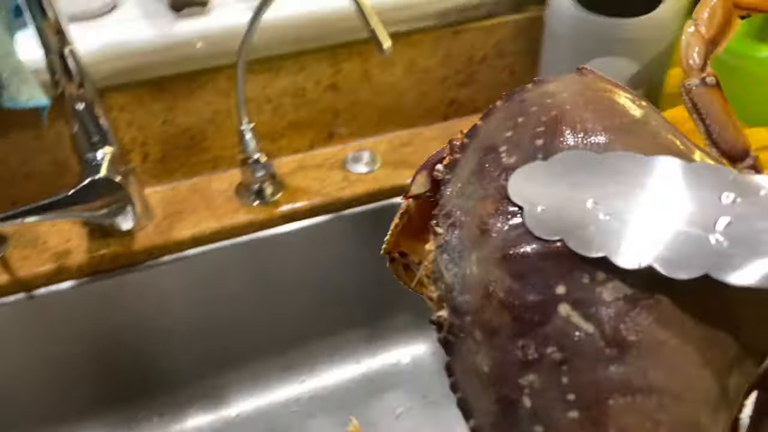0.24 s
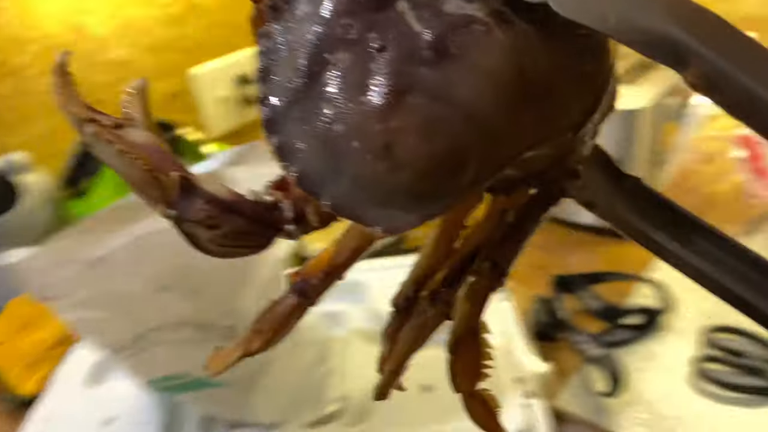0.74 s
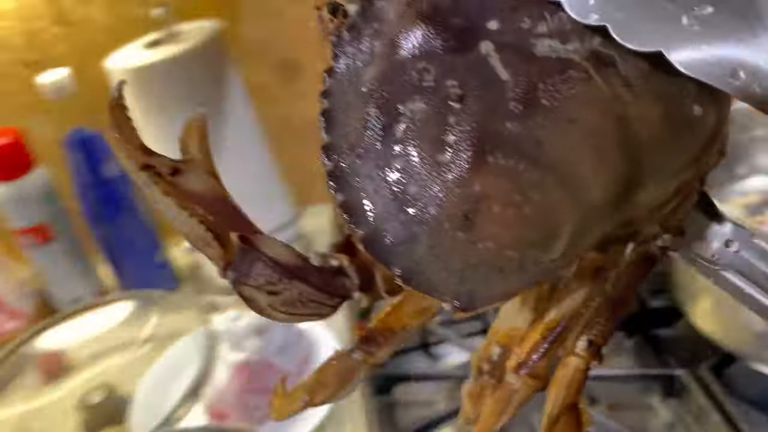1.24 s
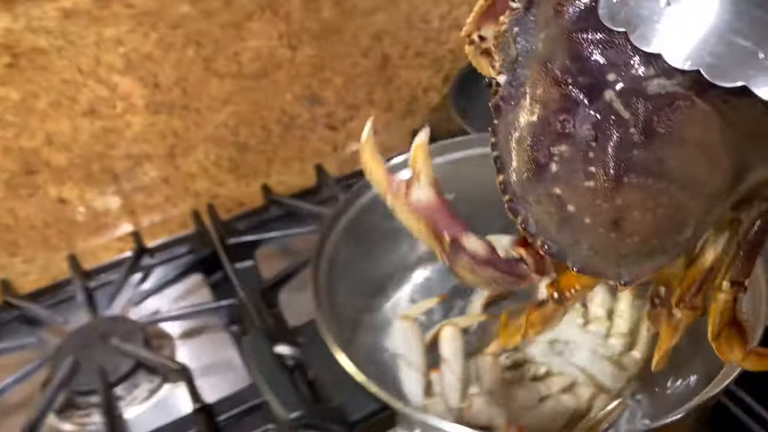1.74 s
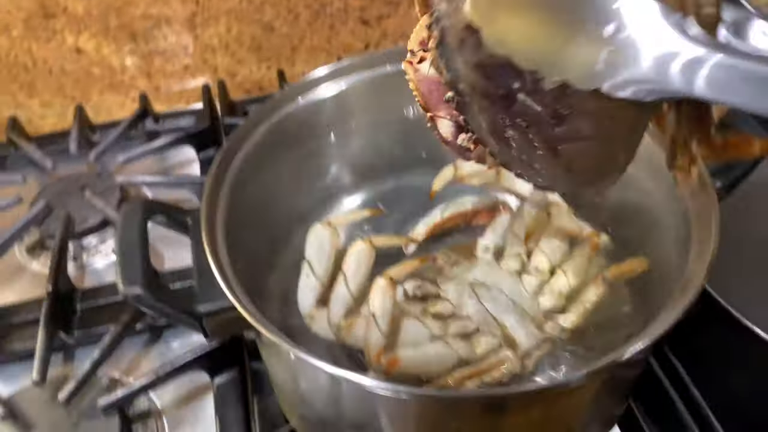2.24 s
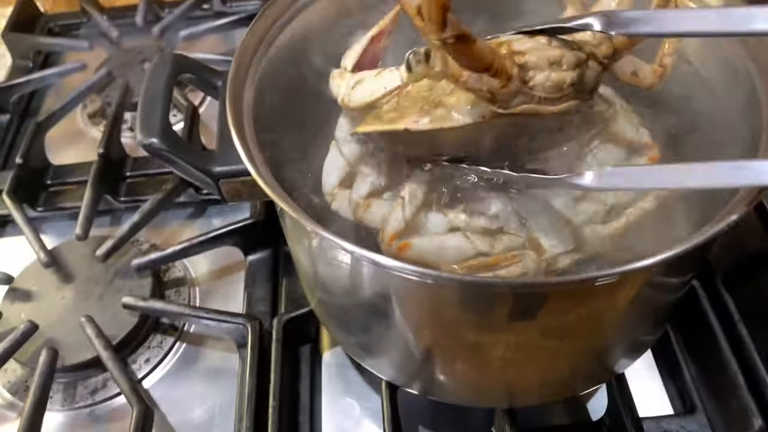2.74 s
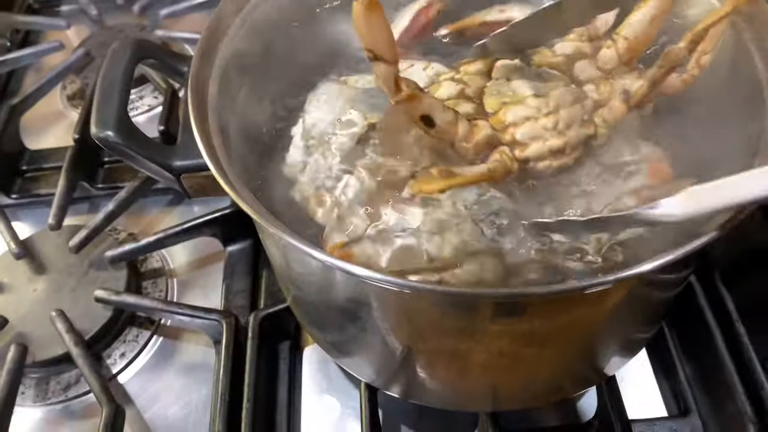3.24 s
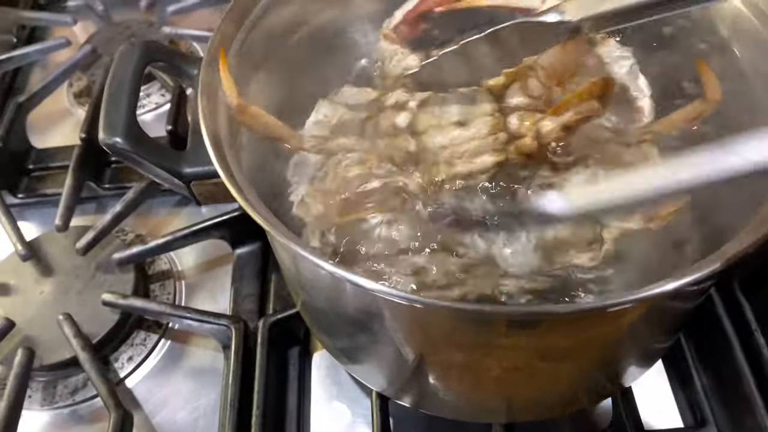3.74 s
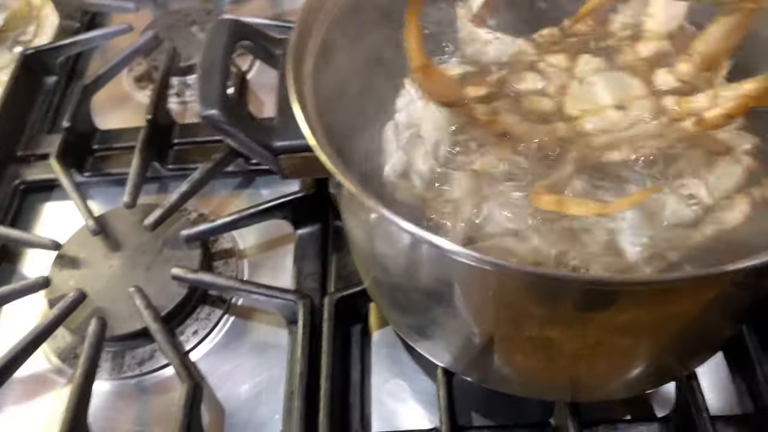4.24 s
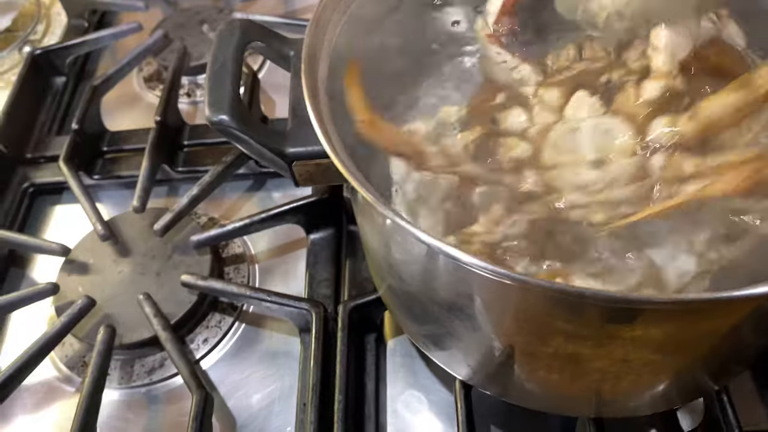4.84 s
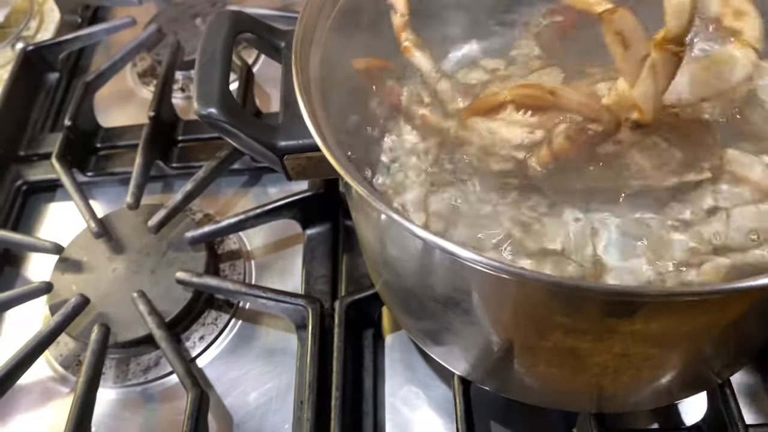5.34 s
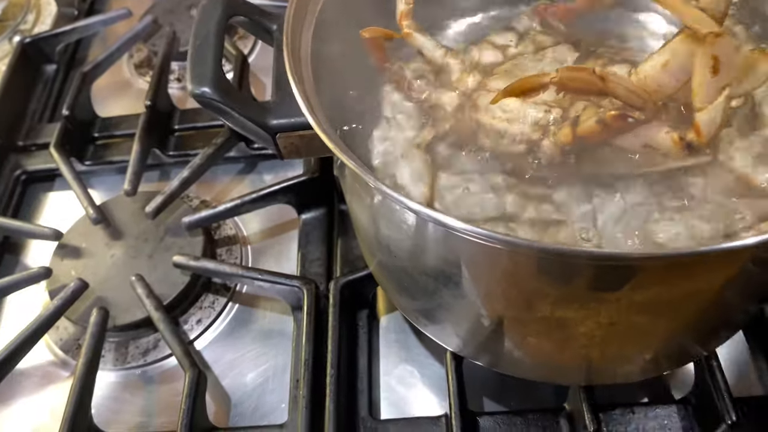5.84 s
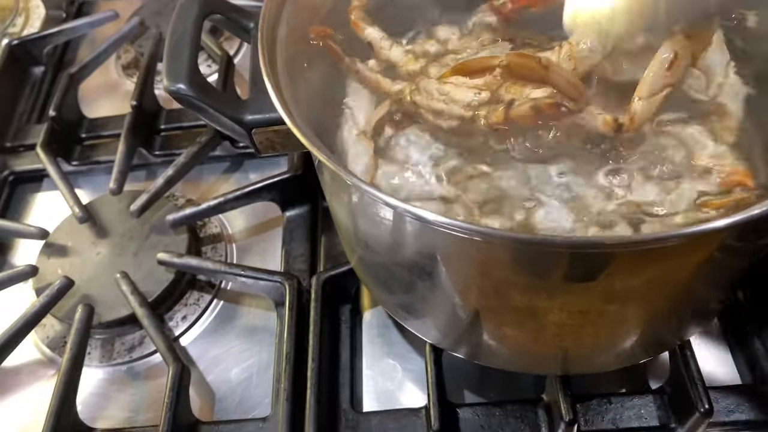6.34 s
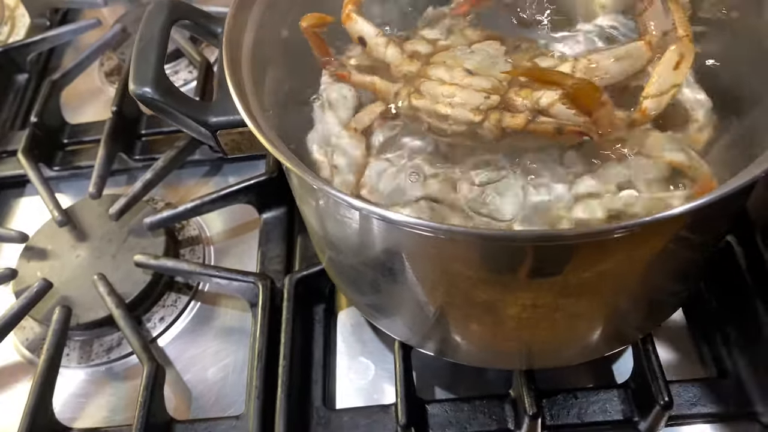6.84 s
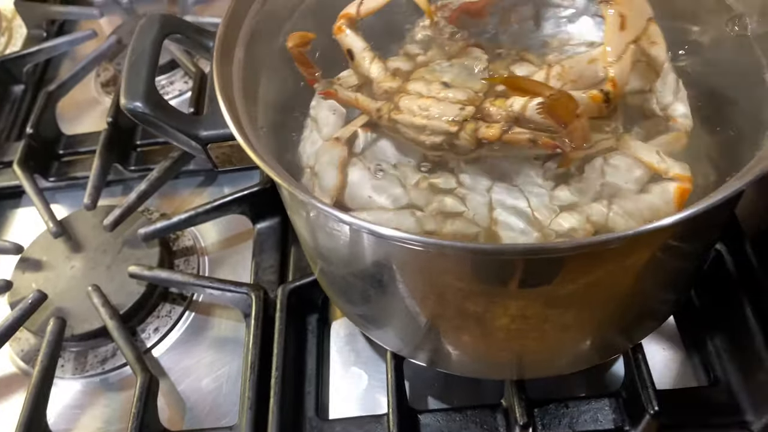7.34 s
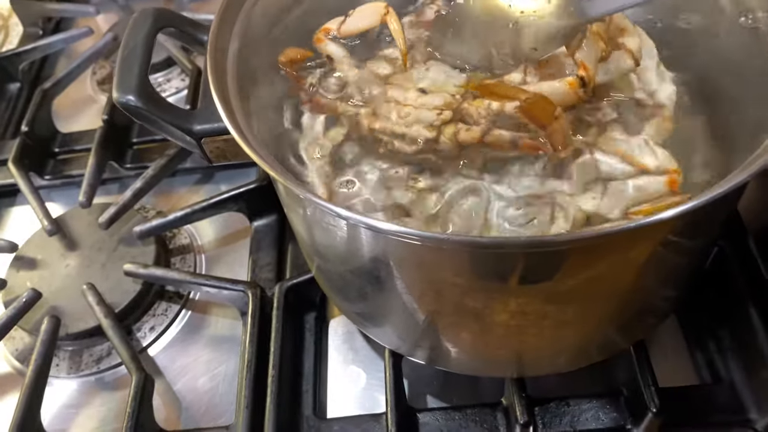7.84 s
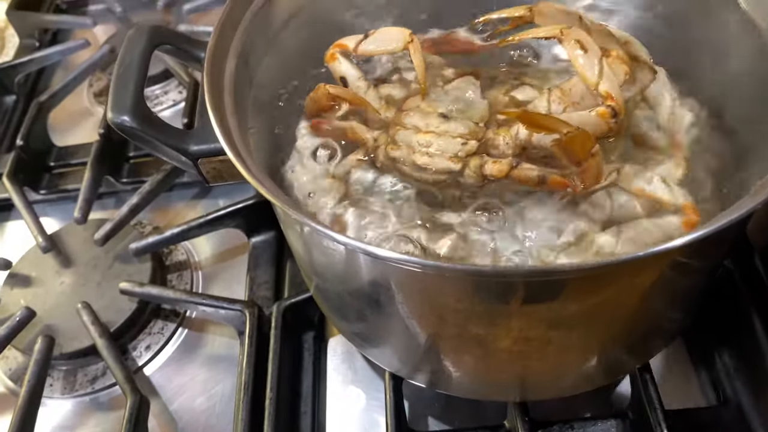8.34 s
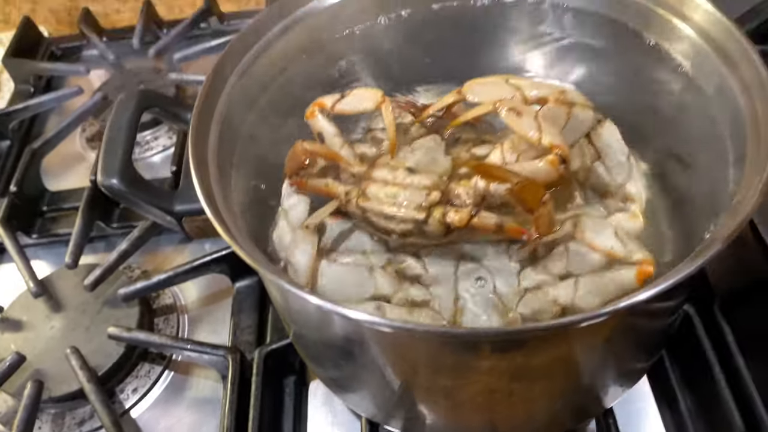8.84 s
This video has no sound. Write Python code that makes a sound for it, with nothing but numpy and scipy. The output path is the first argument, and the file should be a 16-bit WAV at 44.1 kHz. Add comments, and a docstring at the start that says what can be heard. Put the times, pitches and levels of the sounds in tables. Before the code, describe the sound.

A close stereo microphone in a small, hard-walled kitchen. A soft gas-burner roar, low fan hum and faint fizzing run throughout. At 0-0.7 s there is a brief hiss with a few light clicks, short scrapes and a dull knock; then the background recedes slightly. From 2 s it comes nearer, with small simmering bubbles and a couple of taps. At 2.7-3.6 s steel tongs clatter rapidly on shell and pot rim, scraping, with low pot booms, sloshing and crackling hiss. A lull has slight knocks until a sharp, ringing rim clank and longer scrape at 4.5 s, followed by bright clicks. At 5.3-5.5 s quick plops pop loudly, then spitting hiss lasts to about 6.9 s amid scattered shell taps. A strong click and boom land at 6.75 s, lighter knocks at 7.5 s. Simmering continues, with a faint double tong clack at 8.6 s, ending near 9 s.

```python
"""A small kitchen, close to the stove: steel tongs push a crab into a pot among other shells.
Tongs and shells click, knock and scrape: noise cracks and damped modes. The pot booms low on its grate.
Water sloshes as coloured noise, plops and bubbles as rising sines, and hisses with spitting droplets.
A gas burner (noise) and a fan (sines) drone behind. Two microphone ports pick it all up close by."""
import sys
import numpy as np
from scipy import signal
from scipy.fft import rfft, irfft, next_fast_len
from scipy.io import wavfile
from scipy.ndimage import uniform_filter1d, map_coordinates

SR = 44100
rng = np.random.default_rng(int(sys.argv[2]) if len(sys.argv) > 2 else 0)


def store_wav(level_fs):
    """Save 16-bit WAV to argv[1]."""
    pcm = np.round(np.clip(np.atleast_2d(level_fs), -1, 1) * 32767)
    wavfile.write(sys.argv[1], SR, pcm.T.astype(np.int16))


N = 400428

# The walls of the kitchen. Each row: frequency in Hz, decay time t60 in s.
ROOM_DECAY = [(100, 0.83), (1000, 0.2), (4000, 0.39), (14000, 0.2)]
WATER_ROOM_DB = -8  # the water excites the room this much less than the tongs do

# How near the stove is. Each row: time in s, gain in dB.
NEARNESS_GAIN = [(0, 2), (.8, -5.5), (1.1, -2), (2.6, 3.5), (7.2, -1), (9.08, 0)]
# Roar and hum fill the room, so they follow nearness only in part (dB per dB).
BURNER_DB, BURNER_FOLLOWS, SIMMER_DB = -49.5, 0.57, -54
# Fan and motor, before nearness. Each row: frequency in Hz, level in dB rms.
FAN_TONES = [(114, -71), (215.3, -60), (339.1, -63.5), (443, -68)]

# Noise colours. Each row: frequency in Hz, relative level in dB per Hz.
BURNER_COLOUR = [(32, -36), (44, 7), (120, 0.5), (160, -11.5), (230, -8), (420, -8.5), (750, -22.5),
                 (1500, -50), (6000, -68)]
SIMMER_COLOUR = [(300, 9), (900, 2.5), (1400, -1), (2100, 2.5), (3100, -1.5), (3700, -7.5), (4600, -5.5),
                 (7200, -6.5), (10000, -9), (16000, -28)]
HISS_COLOUR = [(500, 0.5), (1700, 1.5), (3200, 3.5), (4000, 4.5), (6000, 0), (9500, -1.5), (12000, 0),
               (14000, -3.5), (16000, -27)]
SLOSH_COLOUR = [(40, 8), (110, 7.5), (165, -5.5), (230, 1.5), (450, 2.5), (750, -9.5), (1300, -12),
                (3000, -42)]
SCRAPE_COLOUR = [(200, 3.5), (600, 2), (1500, -6), (2000, 3.5), (3100, 2), (4600, 3), (6500, 1.5),
                 (10200, -1), (12500, -3), (16000, -24)]
CRACK_COLOUR = [(100, -2), (400, -6.5), (1000, -2), (1450, -2.5), (2000, 1.5), (3100, 4), (4600, 2),
                (6500, 4.5), (8500, 4.5), (10200, -4.5), (12500, 2), (16000, -22)]

# Spells of hissing water. Each row: start in s, hold in s, level in dB.
SIZZLE_SPELLS = [(0, 0.019, -39.5), (2.737, 0.71, -49), (5.604, 1.24, -46)]
SIZZLE_ATTACK_S, SIZZLE_SAG_DB_PER_S, SIZZLE_RELEASE_DB_PER_S = 0.008, 7, 78
FIZZ_DB = -64.5  # the hiss that never stops
# Spitting droplets: level over the hiss, middle pitch, rate.
DROPLET_DB, DROPLET_HZ, DROPLETS_PER_S = -0.5, 3660, 120

# Bubbles of the simmer: smallest level, range above it, life in cycles.
BUBBLE_DB, BUBBLE_SPREAD_DB, BUBBLE_CYCLES = -58.5, 13, 18
BURST_DB = -60.5  # rms level of the steam bubbles bursting at the surface, after the treble cut
AT_POT_S = 2  # from here on single bubbles are near enough to be heard
# Water closes over an air pocket.
# Each row: start in s, pitch in Hz, level in dB, t60 in s, level of the surface snap in dB.
AIR_POCKETS = [(4.622, 2233, -31.5, 0.19, -45), (5.2754, 650, -31.5, 0.024, -31),
               (5.28, 920, -25, 0.026, -41), (5.303, 1030, -31.5, 0.043, -43),
               (5.3448, 1595, -10.5, 0.013, -17), (5.357, 1584, -25, 0.039, -28),
               (5.4108, 1010, -20.5, 0.013, -36), (5.4171, 1206, -17.5, 0.018, -22.5),
               (5.476, 890, -31, 0.038, -39.5), (7.109, 1580, -33.5, 0.028, -48)]
SNAP_T60_S = 0.021
SPLIT_RATIO, SPLIT_DB = 1.98, -4  # a smaller bubble splits off: pitch and level against the first

# The tongs strike, slide on and rock the load. Each row: start in s, surface, strike level in dB before
# colouring, note in Hz, slide length in s, scrape level in dB before easing off, boom level in dB.
PUSH_EVENTS = [(0.0565, "claw", -25, 4860, 0.04, -41, -41.5), (0.179, "claw", -33, 2390, 0.037, -45, -47),
               (0.445, "belly", -40, 790, 0.2, -56, -54), (2.2004, "back", -30, 1850, 0.063, -40.5, -79),
               (2.7589, "back", -11.5, 6700, 0.054, -32.5, -25),
               (2.818, "back", -24, 2440, 0.085, -32.5, -28.5),
               (2.976, "back", -22, 1130, 0.042, -42, -23.5),
               (3.108, "belly", -34.5, 1890, 0.078, -51.5, -40.5),
               (3.219, "rim", -19, 7300, 0.065, -29.5, -34.5),
               (3.378, "belly", -30, 1170, 0.033, -43.5, -48),
               (3.5681, "back", -22.5, 2640, 0.026, -44, -32.5),
               (4.4834, "rim", -6.5, 2963, 0.21, -35, -29), (4.868, "back", -27, 2350, 0.16, -46, -36),
               (5.074, "claw", -24, 3240, 0.031, -45, -30.5), (5.135, "back", -23, 1850, 0.25, -47, -27),
               (5.93, "claw", -28.5, 3200, 0.036, -47.5, -62),
               (6.0902, "belly", -27.5, 1010, 0.08, -54, -33),
               (6.1704, "claw", -24.5, 3030, 0.074, -41, -31), (6.3868, "claw", -22, 3400, 0.055, -51, -53),
               (6.7512, "claw", -10, 3220, 0.06, -51, -23), (7.4914, "claw", -25, 4500, 0.088, -63, -42)]
# The tongs only glance off. Each row: start in s, surface, strike level in dB before colouring, note in Hz.
TAP_EVENTS = [(0.6407, "back", -29, 1390), (2.313, "claw", -22.5, 2200), (2.715, "back", -25.5, 5960),
              (2.787, "back", -25, 1880), (2.832, "back", -25, 2100), (2.911, "rim", -26.5, 9700),
              (2.954, "rim", -18, 5860), (3.0071, "rim", -23, 10000), (3.073, "back", -35, 1850),
              (3.171, "back", -36.5, 5660), (3.698, "back", -29.5, 1070), (3.9519, "rim", -28, 2660),
              (4.524, "rim", -19, 10200), (4.619, "rim", -18.5, 10000), (4.6703, "claw", -13, 5540),
              (5.178, "rim", -25, 4230), (5.19, "rim", -15.5, 10450), (6.0074, "rim", -30.5, 5900),
              (6.321, "claw", -27, 3170), (6.425, "back", -32.5, 1390), (6.457, "back", -34, 3300),
              (6.672, "back", -20.5, 2960), (6.7578, "back", -23, 605), (7.6253, "back", -31, 1920)]
# The part of the pot or crab that the tongs meet sets the colour.
# Each row: surface name, then knock in dB, click treble in dB, crack t60 in s, scrape treble in dB.
SURFACE_COLOURS = {"rim": (4.9, 9.3, 0.034, 5.8), "claw": (-4, -2, 0.14, -3),
                   "back": (6.5, 0, 0.1068, -10.5), "belly": (13, -9, 0.24, -4)}
# Hollow shells bump. Each row: start in s, pitch in Hz, level in dB.
SHELL_KNOCKS = [(0.461, 266, -33), (2.761, 1036, -26), (2.979, 480, -24), (3.463, 474, -33.5),
                (4.134, 389, -30), (6.668, 884, -35), (6.759, 555, -25.5), (7.641, 414, -29)]
KNOCK_T60_S = 0.049
# The empty tongs spring shut. Each row: start in s, level in dB before a treble lift.
TONG_CLACKS = [(8.5754, -45), (8.5947, -50)]

# The full pot on its grate. Each row: mode in Hz, level in dB, t60 in s.
POT_MODES = [(68, -9, .25), (96, -5, .22), (117, 0, .23), (230, -11, .22), (325, -13, .16), (450, -7, .11),
             (590, -9, .1)]
# Pot and tongs together. Each row: mode in Hz, level in dB, t60 in s before damping.
STEEL_MODES = [(1190, -11, .16), (1885, -1, .14), (2040, -2, .2), (2445, 2, .16), (2705, -4, .1),
               (2972, 4, .12), (3225, -1, .14), (3590, -5, .18), (4258, -7, .16), (4822, -5, .12),
               (5230, -5, .18), (5886, -5, .12), (6690, -6, .15), (9850, 2, .06), (10180, 2, .06),
               (10950, -1, .09), (11990, -5, .1)]
# The free arms of the tongs. Each row: mode in Hz, level in dB, t60 in s before damping.
ARM_MODES = [(3888, -5, .09), (4215, 0, .08), (4295, 1, .08), (4600, 1, .11), (5395, -3, .11),
             (6060, -1, .11), (8720, -4, .09), (9790, -6, .08), (10830, -4, .08), (12200, -4, .08)]
STRIKE_TO_BOOM_S, ROCK_S = 0.01094, .083  # the pot answers late; gap between its jolts
SLOSH_DB, SLOSH_FOLLOWS = -24.5, 0.47  # slosh at a boom of 0 dB; dB of slosh per dB of boom
GRIP_DETUNE = 0.0069  # the grip shifts the steel's modes by about this share from strike to strike
SPOT_DB, SPOT_T60_S = -9, .028  # the note of the struck spot: level against the strike, life
WANDER_HZ = 21  # loose contact blurs each mode to this width
DAMPED_T60_S, AFTER_RING_DB = 0.03, -13.5  # the tongs stay on and choke the ring; this much rings on
SCRAPE_SAG_DB = 5.5  # a stroke eases off by this much along its length

# The two microphone ports. Each row: frequency in Hz, left port's phase lead in radians.
PORT_LEAD = [(1800, 0), (2400, -1.2), (4300, -1.3), (5100, 0), (6200, 1.5), (7400, 3.1), (8500, 4.3),
             (9800, 6.1), (11300, 6.6), (12800, 9), (14300, 9.7), (15500, 12.3)]
# Each row: frequency in Hz, likeness of diffuse sound at the two ports, 1 being identical.
PORT_LIKENESS = [(60, .997), (130, .985), (300, .88), (650, .5), (1300, .75), (2600, .3), (4000, .25),
                 (5200, .65), (7200, .98)]
# Each row: frequency in Hz, left minus right in dB.
PORT_COLOUR = [(200, -1), (1200, 4), (2400, -0.5), (8000, 0)]
TOP_HZ = 16500


def amp(db):
    """Decibels to gain."""
    return 10 ** (np.asarray(db) / 20)


def unit(x):
    """Scale to rms 1."""
    return x / np.sqrt(np.mean(x ** 2) + 1e-20)


def along(points, hz):
    """Read (Hz, value) points on a log axis."""
    f, v = np.transpose(points)
    return np.interp(np.log(hz + 1), np.log(f + 1), v)


def seconds(length):
    """A time axis."""
    return np.arange(int(length * SR)) / SR


def onset(t, rise_s):
    """A soft start with time constant rise_s."""
    return 1 - np.exp(-t / rise_s)


def wobble(rate):
    """A smooth random curve, rate knots a second."""
    knots = rng.standard_normal(int(N * rate / SR) + 4)
    coarse = np.arange(0, N + 64, 64)
    return np.interp(np.arange(N), coarse, map_coordinates(knots, [coarse * rate / SR]))


def add(track, s, sound):
    """Mix a sound into a track at time s."""
    part = track[..., max(round(s * SR), 0):][..., :sound.shape[-1]]
    part += sound[..., :part.shape[-1]]


def filtered(x, response):
    """x times a response of frequency."""
    n = x.shape[-1]
    m = next_fast_len(n + 4096)
    return irfft(rfft(x, m) * response(np.fft.rfftfreq(m, 1 / SR)), m)[..., :n]


def shelf(hz, db, corner_hz):
    """Gain that shifts everything above a corner by db."""
    return amp(db / (1 + (corner_hz / (hz + 1)) ** 4))


def diffuse(pair, spectrum):
    """Two unrelated signals become a coloured stereo field of rms 1, as alike as the ports hear it."""
    def response(hz):
        turn = np.arccos(np.clip(along(PORT_LIKENESS, hz), -1, 1)) / 2
        return amp(along(spectrum, hz)) * np.array([np.cos(turn), np.sin(turn)])
    mid, side = filtered(pair, response)
    return unit(np.array([mid + side, mid - side]))


def rush(spectrum):
    """Steady stereo noise of rms 1."""
    return diffuse(rng.standard_normal((2, N)), spectrum)


def patchy(n, depth_db):
    """Two noises in which narrow bands flare up for some tens of milliseconds."""
    z = signal.stft(rng.standard_normal((2, n)), nperseg=512)[2]
    field = uniform_filter1d(rng.standard_normal(z.shape[1:]), size=3, axis=0)
    field = uniform_filter1d(field, size=4, axis=1)
    return signal.istft(z * amp(depth_db * unit(field)), nperseg=512)[1][:, :n]


def grains(n, rate, spread_db, life):
    """Envelope of about rms 1 of many tiny random contacts, each fading with time constant life."""
    chance, size = rng.random(n), rng.standard_normal(n)
    kicks = (chance < rate / SR) * amp(spread_db * np.clip(size, -2, 2))
    power = signal.lfilter([1], [1, -np.exp(-2 / (life * SR))], kicks ** 2)
    mean_power = np.mean(kicks ** 2) * life * SR / 2
    return np.sqrt(np.abs(power) / (mean_power + 1e-12))


def ring(modes, t, scatter_db, blur_hz=0):
    """Damped modes, struck at new strengths and phases; a drifting phase makes them rough."""
    hz, db, t60 = np.transpose(modes)[:, :, None]
    strength = amp(db + scatter_db * rng.standard_normal(hz.shape))
    steps = rng.standard_normal((len(hz), len(t)))
    drift = np.cumsum(steps, axis=1) * np.sqrt(blur_hz / (2 * np.pi * SR))
    waves = np.sin(2 * np.pi * (hz * t + rng.random(hz.shape) + drift)) * amp(-60 * t / t60)
    return (strength * waves).sum(0) / np.linalg.norm(strength)


def note(hz, t60):
    """One short, rough resonance of a struck part."""
    t = seconds(.1)
    return ring([(hz, 0, t60)], t, scatter_db=0, blur_hz=WANDER_HZ) * onset(t, 1 / hz)


def kitchen(x):
    """The hard walls answer with a decaying diffuse tail; treble mostly dies sooner than bass."""
    colour = [(100, 6.0), (3000, 0.0), (7000, 0.5), (15000, -9.5)]
    noise = diffuse(rng.standard_normal((2, SR // 2)), colour)
    hz, t, z = signal.stft(noise, SR, nperseg=256)
    tail = signal.istft(z * amp(-60 * t / along(ROOM_DECAY, hz)[:, None]), SR, nperseg=256)[1]
    delay = int(0.0046 * SR)
    tail = np.pad(tail / np.linalg.norm(tail[0]), ((0, 0), (delay, 0)))
    return signal.fftconvolve(x, tail, axes=1)[:, :N]


def nearness():
    """The distance to the stove as a gain in dB for each sample."""
    s, db = np.transpose(NEARNESS_GAIN)
    return np.interp(np.arange(N) / SR, s, db)


def fan(near_db):
    """Fan and motor hum in steady tones whose phases wander."""
    t = np.arange(N) / SR
    hum = sum(amp(db) * np.sqrt(2) * np.sin(2 * np.pi * hz * t + wobble(18)) for hz, db in FAN_TONES)
    return amp(BURNER_FOLLOWS * near_db) * hum


def burner(near_db):
    """The gas flame roars softly: mostly low noise with an unsteady level."""
    return amp(BURNER_DB + BURNER_FOLLOWS * near_db + wobble(13)) * rush(BURNER_COLOUR)


def simmer(near_db):
    """Countless bubbles merge into a dense murmur: noise with flaring bands."""
    murmur = diffuse(patchy(N, depth_db=2.5), SIMMER_COLOUR)
    return amp(SIMMER_DB + near_db + 0.47 * wobble(14)) * murmur


def sizzle():
    """Each spell of crackling hiss flares up, sags while the water lasts and dies away to a faint fizz."""
    power = np.full(N, amp(FIZZ_DB) ** 2)
    for s, hold, db in SIZZLE_SPELLS:
        t = seconds(hold + 1)
        fall_db = SIZZLE_SAG_DB_PER_S * t + SIZZLE_RELEASE_DB_PER_S * np.maximum(t - hold, 0)
        add(power, s, (amp(db - fall_db) * onset(t, SIZZLE_ATTACK_S)) ** 2)
    crackle = grains(N, rate=700, spread_db=4, life=.001)
    return np.sqrt(power) * diffuse(rng.standard_normal((2, N)) * np.hypot(1, crackle), HISS_COLOUR)


def bubble(hz, t60, rise):
    """A bubble rings and climbs in pitch as it nears the surface."""
    t = seconds(t60)
    wave = np.sin(2 * np.pi * hz * t * (1 + rise * t / t60))
    return wave * amp(-60 * t / t60) * onset(t, 0.00084)


def droplets():
    """While the water hisses, tiny droplets spit and burst at random, a few much louder than the rest."""
    out = np.zeros(N)
    for s, hold, db in SIZZLE_SPELLS:
        for when, pitch, size in rng.random((int(hold * DROPLETS_PER_S), 3)):
            hz = DROPLET_HZ * 2 ** (3 * (pitch - .5))
            level_db = db + DROPLET_DB - SIZZLE_SAG_DB_PER_S * when * hold + 14 * size ** 3
            add(out, s + when * hold, amp(level_db) * bubble(hz, 14 / hz, rise=.1))
    return out


def small_bubbles(count=1100):
    """Close to the pot, single bubbles of the simmer ring at random pitches, most of them faint."""
    out = np.zeros(N)
    for when, pitch, size in rng.random((count, 3)):
        hz = 450 * 6.5 ** pitch
        s = AT_POT_S + (N / SR - AT_POT_S) * when
        level_db = BUBBLE_DB + BUBBLE_SPREAD_DB * size ** 3
        add(out, s, amp(level_db) * bubble(hz, BUBBLE_CYCLES / hz, rise=0.1))
    return out


def steam_bursts():
    """Close to the pot, steam bubbles burst at the surface in short puffs of noise."""
    at_pot = np.arange(N) > AT_POT_S * SR
    bursts = rng.standard_normal(N) * grains(N, rate=34, spread_db=1, life=.005) * at_pot
    colour = lambda hz: amp(along(SIMMER_COLOUR, hz)) * shelf(hz, -10, 3300)
    return amp(BURST_DB) * unit(filtered(bursts, colour))


def snap():
    """The water surface slaps shut in a very short burst."""
    t = seconds(.03)
    colour = lambda hz: amp(along(CRACK_COLOUR, hz)) * shelf(hz, -2, 2400)
    burst = unit(filtered(rng.standard_normal(len(t)), colour))
    return burst * amp(-60 * t / SNAP_T60_S) * onset(t, 0.00051)


def plops():
    """Water closes over air pockets: each plop is a snap, two bubbles and four stray blips."""
    out = np.zeros(N)
    for s, hz, db, t60, snap_db in AIR_POCKETS:
        add(out, s, amp(snap_db) * snap())
        add(out, s, amp(db) * bubble(hz, t60, rise=min(.2, .004 / t60)))
        add(out, s, amp(db + SPLIT_DB) * bubble(hz * SPLIT_RATIO, t60=0.014, rise=0.03))
        for when, pitch in rng.random((4, 2)):
            blip = bubble(hz * (.5 + 2 * pitch), t60, rise=.1)
            add(out, s + .04 * (when - .5), amp(db - 15) * blip)
    return out


def jolts(count=2):
    """Start and boom level of each jolt of the pot; a push longer than the rocking gap jolts it twice."""
    return [(s + STRIKE_TO_BOOM_S + k * ROCK_S, db)
            for s, *_, length, _, db in PUSH_EVENTS for k in range(count) if k * ROCK_S < length]


def slosh():
    """Each jolt stirs the water into a dying rush of low noise; the powers of the jolts add up."""
    power, t = np.zeros(N), seconds(0.69)
    for s, db in jolts():
        level = amp(SLOSH_DB + SLOSH_FOLLOWS * db - 60 * t / 0.43)
        add(power, s, (level * onset(t, 0.00084)) ** 2)
    return np.sqrt(power) * rush(SLOSH_COLOUR)


def pot_booms():
    """Each jolt swells into a low boom of the full pot's modes."""
    out, t = np.zeros(N), seconds(0.69)
    for s, db in jolts():
        add(out, s, amp(db) * ring(POT_MODES, t, scatter_db=2) * onset(t, 0.0081))
    return out


def shell_knocks():
    """Hollow shells bump dully: a short resonance and a fainter, shorter one above it."""
    out = np.zeros(N)
    for s, hz, db in SHELL_KNOCKS:
        add(out, s, amp(db) * (note(hz, KNOCK_T60_S) + amp(-14.0) * note(hz * 1.6, KNOCK_T60_S / 2)))
    return out


def scrapes():
    """Steel slips over shell in uneven catches; pressing damps the modes and shifts them each stroke."""
    out = np.zeros((2, N))
    for s, surface, _, _, length, db, _ in PUSH_EVENTS:
        *_, treble_db = SURFACE_COLOURS[surface]
        t, held = seconds(length + 0.08), seconds(.05)
        body = ring(STEEL_MODES, held * rng.uniform(.99, 1.01), scatter_db=2) * amp(-60 * held / .06)
        catches = grains(len(t), rate=260, spread_db=2.5, life=.002)
        slips = diffuse(patchy(len(t), depth_db=3.5) * catches, SCRAPE_COLOUR)
        rung = unit(signal.fftconvolve(slips, body[None], axes=1)[:, :len(t)])
        release = np.exp(-np.maximum(t - length, 0) / 0.0091)
        pressure = onset(t, 0.0027) * release * amp(-SCRAPE_SAG_DB * t / length)
        stroke = unit(filtered(slips + rung, lambda hz: shelf(hz, treble_db, 3700)))
        add(out, s, amp(db) * pressure * stroke)
    return out


def blow(modes, crack_t60, ring_db):
    """A hard contact: a crack, a rebound milliseconds later, chatter and steel whose ring is soon choked."""
    t = seconds(.22)
    late = t - rng.uniform(0.0037, 0.0046)
    rebound = (late > 0) * amp(-14.5 - 60 * np.abs(late) / crack_t60)
    chatter = amp(-13.0 - 60 * t / 0.053)
    dying = amp(-60 * t / crack_t60) + rebound + chatter
    crack = unit(filtered(rng.standard_normal(len(t)), lambda hz: amp(along(CRACK_COLOUR, hz)))) * dying
    choke = amp(-60 * t / DAMPED_T60_S) + amp(AFTER_RING_DB)
    steel = choke * ring(modes, t, scatter_db=4.5, blur_hz=WANDER_HZ)
    return (amp(-2.5) * crack + amp(ring_db) * steel) * onset(t, 0.0002)


def clacks():
    """The empty tongs spring shut at the end: bright blows on their free arms."""
    out = np.zeros(N)
    for s, db in TONG_CLACKS:
        clack = blow(ARM_MODES, crack_t60=0.059, ring_db=6.5)
        add(out, s, amp(db) * filtered(clack, lambda hz: shelf(hz, 17.5, 2300)))
    return out


def strike(surface, db, pitch_hz):
    """Surface sets knock, click and crack, each spot its own note; harder blows ring the steel more."""
    knock_db, treble_db, crack_t60, _ = SURFACE_COLOURS[surface]
    # the knock gain acts below its corner only
    colour = lambda hz: shelf(hz, treble_db, 6000) * shelf(hz, -knock_db, 1710) * amp(knock_db)
    modes = np.array(STEEL_MODES) * [1 + GRIP_DETUNE * rng.uniform(-1.3, 1), 1, 1]
    sound = amp(db - 11.0) * filtered(blow(modes, crack_t60, ring_db=8.0 + 0.61 * db), colour)
    add(sound, 0, amp(db + SPOT_DB) * note(pitch_hz, SPOT_T60_S))
    return sound


def strikes():
    """Every tap is a strike, and every push starts with one."""
    out = np.zeros(N)
    for s, surface, db, hz, *_ in TAP_EVENTS + PUSH_EVENTS:
        add(out, s, strike(surface, db, hz))
    return out


def scene():
    """All at the stove, slightly out of step at the two ports; the pot shields the water from the walls."""
    near_db = nearness()
    stove = fan(near_db) + burner(near_db) + simmer(near_db) + sizzle()
    wet = droplets() + small_bubbles() + steam_bursts() + plops()
    handling = slosh() + pot_booms() + shell_knocks() + scrapes() + clacks() + strikes()
    walls = amp(-10.0) * kitchen(handling + amp(WATER_ROOM_DB) * wet)
    sound = stove + wet + handling + walls
    return filtered(sound, lambda hz: np.exp(.5j * np.array([[1], [-1]]) * along(PORT_LEAD, hz)))


def record(dry):
    """The ports differ a little in colour; the microphone sheds deep bass and all above its band limit."""
    band = lambda hz: (hz < TOP_HZ) / np.hypot(1, (41 / (hz + 1)) ** 6)
    balance = lambda hz: amp(np.array([[.5], [-.5]]) * along(PORT_COLOUR, hz))
    return filtered(dry, lambda hz: band(hz) * balance(hz))


dry = scene()
out = record(dry)
store_wav(out)
```